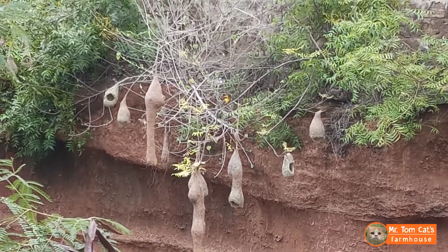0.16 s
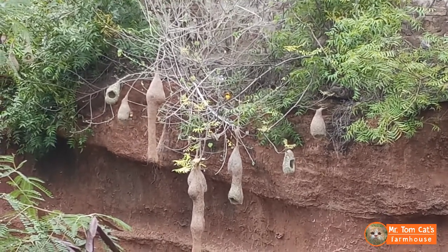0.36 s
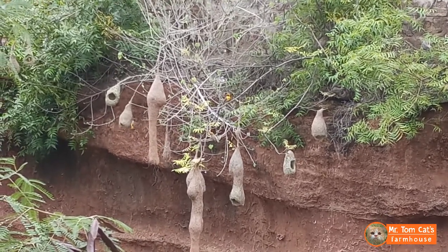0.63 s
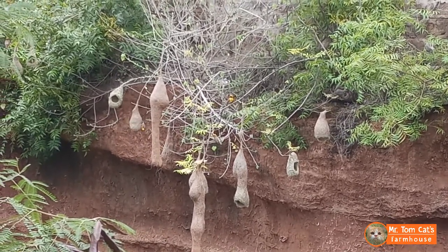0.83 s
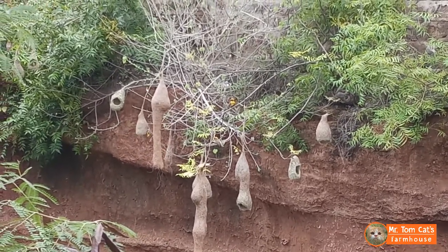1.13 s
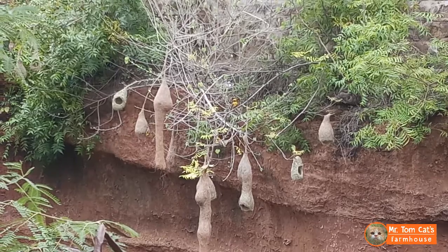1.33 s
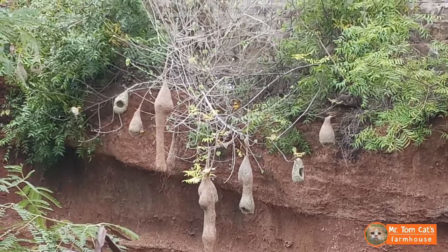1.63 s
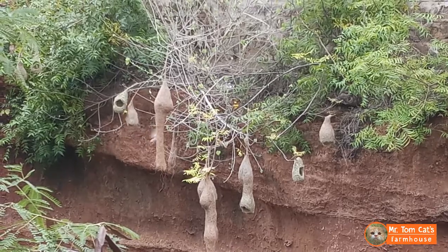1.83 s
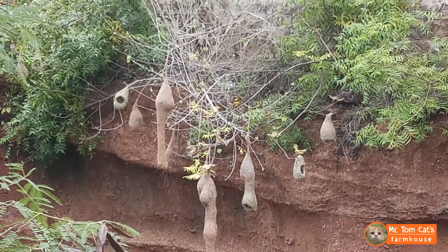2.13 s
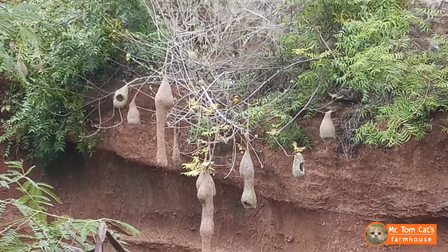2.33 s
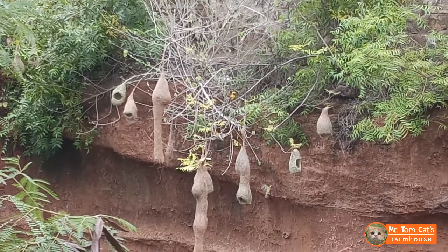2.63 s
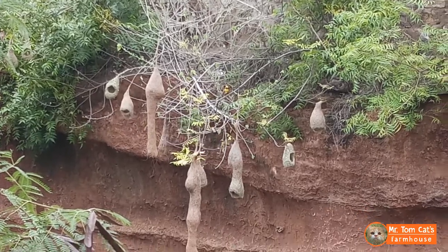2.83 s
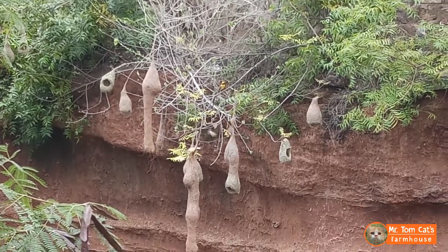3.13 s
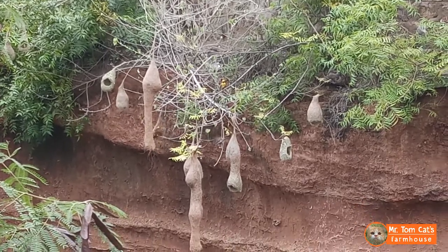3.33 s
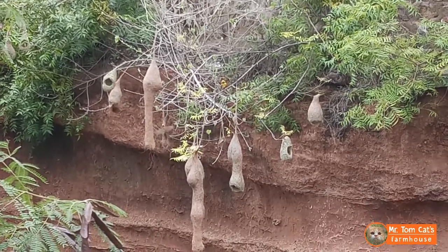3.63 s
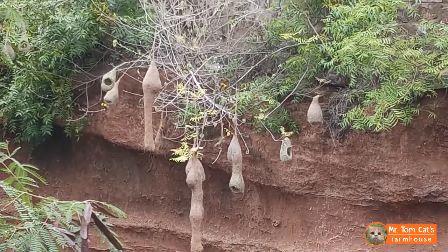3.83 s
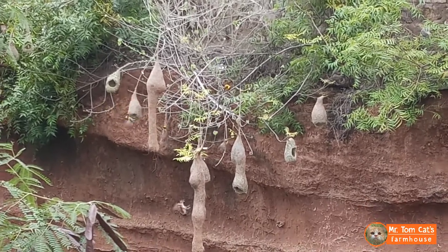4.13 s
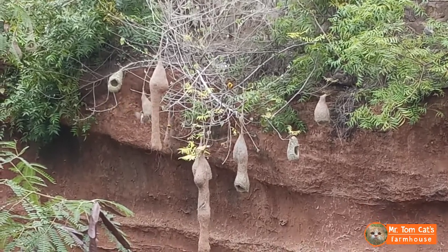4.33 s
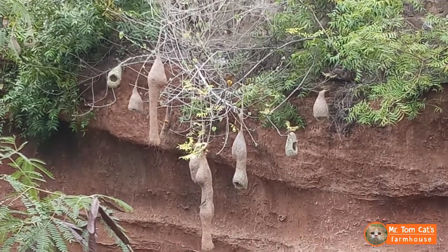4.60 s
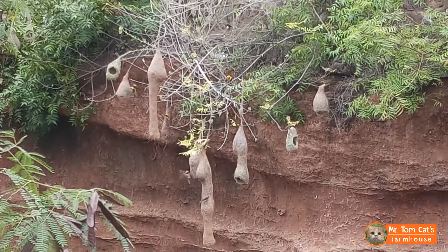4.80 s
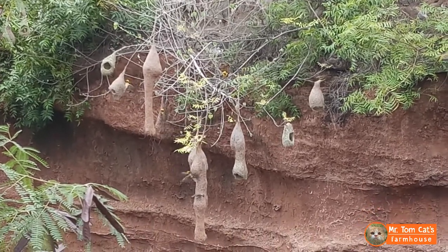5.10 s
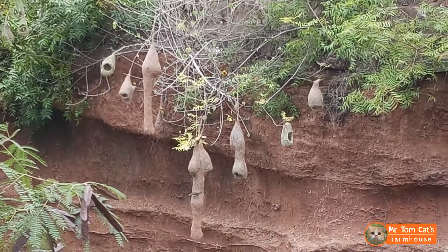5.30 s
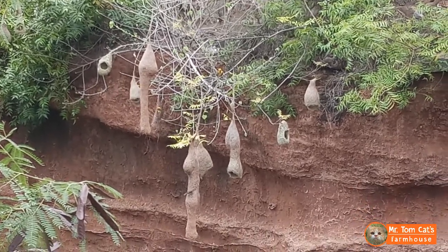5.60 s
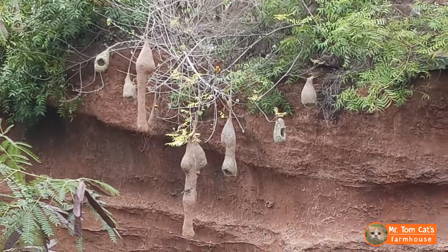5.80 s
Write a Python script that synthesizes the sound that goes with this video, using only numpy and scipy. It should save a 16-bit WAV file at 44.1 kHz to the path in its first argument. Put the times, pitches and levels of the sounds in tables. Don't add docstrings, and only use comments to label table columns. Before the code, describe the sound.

For the first 1.3 seconds it is quiet: a low, wavering far traffic drone, soft tyre roar swelling briefly through gaps, faint leaf hiss and barely audible distant bird slides, with thin down-sweeps near 1.2. From 1.35 to 1.7 a bird gives weak scratchy wheezes. At 1.73 a nearer weaver starts rapid harsh chatter, dry falling notes in pairs around thirteen to the second, strongest near 2.4, then easing; hoarser single notes run from 3.2 to 3.65. Blurred far chatter grows behind. From 3.7 to 4.45 airy, breathy wheezes take over, with a thin rising squeak at 4.17. From 4.5 the chorus thickens with loud nasal wheezes and bright sizzle, peaking near 5.1 and 5.5, joined by long falling whistles at 5.0 and 5.5 and a rise-and-fall at 5.8, where a tiny dry tick occurs. Short diffuse echoes surround the calls, which continue to the end at about six seconds.

```python
import sys
import numpy as np
from scipy import signal
from scipy.fft import rfft, irfft, next_fast_len
from scipy.io import wavfile
from scipy.ndimage import uniform_filter1d, map_coordinates

SR = 44100
rng = np.random.default_rng(int(sys.argv[2]) if len(sys.argv) > 2 else 0)


def log_audio(samples):
    frames = np.atleast_2d(samples).T
    limited = np.clip(frames, -1, 1)
    pcm = np.round(limited * 32767).astype(np.int16)
    wavfile.write(sys.argv[1], SR, pcm)


def magnitude_from_level(level_db):
    exponent = np.asarray(level_db, float) / 20
    return 10 ** exponent


N = 262395


def unit(x):
    return x / np.sqrt(np.mean(np.abs(x) ** 2) + 1e-20)


def along(points, hz):
    f, v = np.transpose(points)
    return np.interp(np.log(hz + 1), np.log(f + 1), v)


def curves(rows, t):
    s, *columns = np.transpose(rows)
    return [np.interp(t, s, column) for column in columns]


def wobble(rate, size=N):
    knots = rng.standard_normal(int(size * rate / SR) + 4)
    return map_coordinates(knots, [np.arange(size) * rate / SR])


def narrow(rate, size):
    return unit(wobble(rate, size=size) + 1j * wobble(rate, size=size))


def filtered(x, response):
    m = next_fast_len(len(x) + 8192)
    return irfft(rfft(x, m) * response(np.fft.rfftfreq(m, 1 / SR)), m)[:len(x)]


def rush(spectrum, patchy_db):
    z = signal.stft(rng.standard_normal(N + 512), nperseg=512)[2]
    field = uniform_filter1d(rng.standard_normal(z.shape), 6, 0)
    field = unit(uniform_filter1d(field, 14, 1))
    x = signal.istft(z * magnitude_from_level(patchy_db * field), nperseg=512)[1][:N]
    return unit(filtered(x, lambda hz: magnitude_from_level(along(spectrum, hz))))


def add(track, s, sound):
    part = track[round(s * SR):][:len(sound)]
    part += sound[:len(part)]


def note(third_hz, length, rasp):
    length = np.clip(length, .008, .15)
    t = np.arange(0, length + .16, 1 / SR)
    rasp_share = np.clip(rasp, 0, 1)
    breaking = 1 - np.exp(-(t / 0.0086) ** 3)
    step_down = .165 / (1 + (t / 0.019) ** 6)
    droop = .13 / (1 + (0.045 / (t + 1e-4)) ** 4)
    turns = np.cumsum(third_hz / 3 * (.85 + step_down - droop)) / SR
    voice = np.zeros(len(t))
    for k in range(4, 9):
        flecks = unit(narrow(400, size=len(t)) * magnitude_from_level(2.5 * wobble(140, size=len(t))))
        smear = np.sqrt(1 - breaking) + np.sqrt(breaking) * .7 * flecks
        size = magnitude_from_level((6 if k == 6 else -2) + 3 * rng.standard_normal())
        voice += size * (smear * np.exp(2j * np.pi * (k * turns + rng.random()))).real
    voice *= (1 - 0.27 * rasp_share * breaking) / np.std(voice)
    hook_db = -1 - 9 * (t / .042) ** 4 - 14 * rasp ** 2 - 5 * np.exp(-((t - .018) / .005) ** 2)
    hook = magnitude_from_level(hook_db) * np.sin(2 * np.pi * 3 * turns) * np.abs(1 + .7 * wobble(150, size=len(t)))
    hiss = rng.standard_normal(len(t)) * magnitude_from_level(1.9 * wobble(259, size=len(t)))
    breath = np.sqrt(rasp_share * (0.031 + 0.58 * breaking))
    release_db = -45 * np.maximum(t - length, 0) / 0.12
    soft_start_db = -4.4 * np.exp(-(t / 0.015) ** 2)
    shape = (1 - np.exp(-(t / 0.0046) ** 2)) * magnitude_from_level(release_db - 3 * t / length + soft_start_db)
    return shape * (np.array([hook, 0.63 * voice]) + magnitude_from_level([[-2], [1.5]]) * breath * hiss)


# f/Hz, level/dB
THROAT = [(590, -52), (1000, -71), (1970, -26.5), (2670, -15), (3720, -6.5), (4200, -4), (5330, -2.5),
          (6290, -4), (6830, -6.5), (8290, -9.5), (9000, -14), (11700, -65), (19800, -120)]
# f/Hz, width/Hz, level/dB
BEAK = [(4400, 500, 4), (5400, 450, 5), (6300, 400, 3)]


def throat(low, high):
    def lower(hz):
        return 1 / (1 + (hz / 3800) ** 12)

    def colour(hz):
        peaks_db = sum(db / (1 + (2 * (hz - c) / w) ** 2) for c, w, db in BEAK)
        return magnitude_from_level(along(THROAT, hz) + peaks_db)

    chest = filtered(low, lambda hz: colour(hz) * lower(hz))
    return chest + filtered(high, lambda hz: colour(hz) * (1 - lower(hz)))


# t/s, peak level/dB, third partial f/Hz, length/s, rasp (0-1)
PAIRED_NOTES = [(1.728, -8.5, 2860, 0.024, 0.4), (1.783, -7.5, 3267, 0.026, 0.33),
                (1.856, -10, 3037, 0.035, 0.4), (1.912, -9.5, 3206, 0.029, 0.55),
                (1.999, -11.5, 3085, 0.049, 0.08), (2.057, -14.5, 3090, 0.04, 0.6),
                (2.137, -12.5, 2997, 0.045, 0.26), (2.193, -9, 3050, 0.02, 0.47),
                (2.278, -6.5, 3025, 0.028, 0.77), (2.3302, -4.5, 3147, 0.022, 0.7),
                (2.4188, -3.5, 3015, 0.019, 0.63), (2.473, -7, 3035, 0.02, 0.6),
                (2.5688, -9.5, 3046, 0.026, 0.38), (2.624, -9, 3220, 0.027, 0.45),
                (2.7066, -9.5, 2970, 0.031, 0.5), (2.787, -10, 3020, 0.018, 0.6),
                (2.843, -19, 3085, 0.029, 0.9), (2.883, -15, 3130, 0.051, 0.36),
                (2.992, -14, 3170, 0.032, 0.4), (3.041, -13, 3180, 0.074, 0.6),
                (3.098, -14.5, 3225, 0.057, 0.75)]
# t/s, peak level/dB, length/s
HOARSE_NOTES = [
    (3.212, -15, 0.081),
    (3.27, -10.5, 0.037),
    (3.358, -13.5, 0.038),
    (3.463, -13.5, 0.053),
    (3.545, -13.5, 0.037),
    (3.62, -14, 0.068),
]
HOARSE_HZ, HOARSE_RASP = 3207, 0.68


def chatter():
    low, high = np.zeros((2, N))
    hoarse = [(s, db, HOARSE_HZ, length, HOARSE_RASP) for s, db, length in HOARSE_NOTES]
    for s, db, third_hz, length, rasp in PAIRED_NOTES + hoarse:
        chest, beak = magnitude_from_level(db - 6.0) * note(third_hz, length, rasp)
        chest_db = -0.5 + 4.5 * (s - PAIRED_NOTES[0][0])
        add(low, s, magnitude_from_level(chest_db) * chest)
        add(high, s, beak)
    return throat(low, high)


# t/s, peak level/dB, centre f/Hz, length/s, broad hiss level/dB
OPENING = [
    (1.353, -29.5, 3400, 0.05, 4),
    (1.396, -18.5, 3363, 0.06, -8),
    (1.42, -31, 4030, .08, -6),
    (1.449, -20, 3030, 0.059, -9),
    (1.575, -32, 3760, 0.065, 7),
    (1.648, -32.5, 4950, 0.042, 7),
]
# t/s, peak level/dB, centre f/Hz, length/s
HISSES = [
    (3.699, -25.5, 4410, 0.046),
    (3.732, -28, 5770, 0.081),
    (3.842, -25, 5140, 0.059),
    (3.925, -28, 4690, 0.077),
    (3.988, -27, 4700, 0.077),
    (4.067, -20.5, 5110, 0.057),
    (4.186, -23.5, 5980, 0.058),
    (4.237, -25, 4300, 0.065),
    (4.339, -24, 5830, 0.081),
    (4.422, -23, 5260, 0.11),
]
# t/s, peak level/dB, centre f/Hz, length/s, broad hiss level/dB
RISERS = [
    (4.165, -15.5, 7500, 0.055, -20),
    (5.073, -11.5, 7060, 0.04, -22),
]
# t/s, peak level/dB, centre f/Hz, length/s, broad hiss level/dB
CHORUS = [(4.492, -17.5, 5280, 0.075, 3), (4.582, -13.5, 5430, 0.094, 2), (4.697, -9, 5520, 0.08, -13),
          (4.769, -16, 4015, 0.071, -1.5), (4.863, -18.5, 4530, 0.091, 2.5), (4.928, -21.5, 4800, 0.055, 6),
          (5.091, -4.5, 4880, 0.072, -12), (5.002, -26, 5100, .08, 8), (5.156, -16, 4200, 0.039, -25),
          (5.367, -9, 4450, 0.077, -21), (5.392, -14, 5130, 0.1, -14), (5.48, -4, 5280, 0.065, -7.5),
          (5.541, -9, 4380, 0.11, -29), (5.622, -17, 4700, 0.089, -30), (5.778, -9, 4490, 0.051, -19),
          (5.865, -17, 6050, 0.081, -8)]
HISS_DB = 9
OPENING_SLIDE, SLIDE, RISE = -0.088, -0.204, 0.325


def wheezes():
    band, broad, t = np.zeros(N), np.zeros(N), np.arange(SR // 4) / SR
    calls = [(*row, OPENING_SLIDE) for row in OPENING]
    calls += [(*row, HISS_DB, SLIDE) for row in HISSES]
    calls += [(*row, RISE) for row in RISERS]
    calls += [(*row, SLIDE) for row in CHORUS]
    for s, db, hz, length, hiss_db, slide in calls:
        attack = 1 - np.exp(-(t / 0.0043) ** 2)
        shape = magnitude_from_level(db - 15.5) * attack * magnitude_from_level(-40 * np.maximum(t - length, 0) / 0.075)
        turns = np.cumsum(hz * 2 ** (slide * (np.minimum(t / length, 1.5) - .5))) / SR
        add(band, s, shape * (narrow(1117.0, size=len(t)) * np.exp(2j * np.pi * turns)).real)
        flutter = magnitude_from_level(hiss_db + 5.5 + 2.7 * wobble(194, size=len(t)))
        add(broad, s, shape * flutter * rng.standard_normal(len(t)))
    windpipe = lambda hz: 1 / (1 + (2600 / (hz + 1)) ** 14)
    return filtered(band, windpipe) + throat(magnitude_from_level(8.0) * broad, broad)


def whistles(calls, wheeze, rate=165.2):
    out = np.zeros(N)
    for rows in calls:
        t = np.arange(rows[0][0], rows[-1][0], 1 / SR)
        hz, db = curves(rows, t)
        skirt = .13 * narrow(1300, size=len(t))
        flutter = 1 + wheeze * narrow(rate, size=len(t)) + skirt
        swing = np.exp(2j * np.pi * np.cumsum(uniform_filter1d(hz, 400)) / SR)
        edges = np.clip(np.minimum(t - t[0], t[-1] - t) / .008, 0, 1)
        add(out, t[0], magnitude_from_level(db + 13.0) * edges * (unit(flutter) * swing).real)
    return out


def glide(calls):
    paths = []
    for s, length, hz, to_hz, db in calls:
        start = (s, hz, db - 2)
        peak = (s + .45 * length, hz + 0.54 * (to_hz - hz), db)
        paths.append([start, peak, (s + length, to_hz, db - 3)])
    return paths


# t/s, f/Hz, level/dB
SONG = [
    [(5.01, 7150, -38), (5.032, 6950, -35), (5.07, 5900, -33), (5.095, 5050, -31), (5.12, 4620, -28),
     (5.158, 4300, -23), (5.215, 3750, -25), (5.24, 3450, -31), (5.26, 3380, -35)],
    [(5.493, 6870, -38), (5.531, 6220, -29), (5.581, 4830, -26), (5.61, 4480, -22), (5.67, 3930, -24),
     (5.715, 3550, -27), (5.732, 3440, -35)],
    [(5.82, 5750, -38), (5.842, 6020, -32), (5.87, 6420, -30), (5.9, 5950, -30), (5.95, 5250, -29)],
]
# t/s, length/s, from f/Hz, to f/Hz, peak level/dB
ANSWERS = [(.19, .068, 1750, 1690, -77), (.25, .35, 878, 860, -90), (4.22, .065, 5100, 4950, -41),
           (4.2, .09, 4300, 4600, -40), (4.493, .065, 5600, 5250, -38), (4.593, .03, 5600, 5500, -35),
           (4.885, .105, 4750, 3300, -37), (5.25, .026, 6400, 6650, -42), (2.715, .035, 2200, 2130, -62),
           (5.865, .085, 4480, 4200, -36), (5.39, .078, 4600, 4170, -35), (5.86, .09, 4600, 3500, -40)]
# t/s, length/s, from f/Hz, to f/Hz, peak level/dB
FAINT_SLIDES = [
    (.17, .17, 3530, 3430, -75),
    (.995, .05, 4800, 4300, -66),
    (1.05, .07, 3800, 3450, -69),
    (1.05, .11, 4600, 4200, -71),
    (.93, .12, 6200, 6300, -73),
    (.97, .09, 2400, 2100, -78),
    (.56, .35, 6280, 6300, -77),
]
# t/s, length/s, from f/Hz, to f/Hz, peak level/dB
WHEEZY_SLIDES = [(4.51, .07, 4700, 3800, -43), (5.35, .05, 4900, 4500, -43), (4.342, .04, 6400, 4900, -43),
                 (4.172, .045, 6400, 8000, -41), (4.175, .05, 7200, 8650, -44), (4.23, .06, 900, 975, -80),
                 (4.342, .065, 6550, 6450, -45), (4.19, .045, 6000, 6500, -44),
                 (4.765, .08, 4600, 3350, -36), (4.882, .06, 6350, 4750, -35),
                 (4.935, .06, 4750, 4550, -36), (1.58, .02, 5200, 2900, -56), (5.355, .09, 6200, 4800, -37),
                 (4.7, .065, 5550, 5150, -33), (4.625, .03, 5700, 5250, -33), (4.66, .03, 5550, 5300, -36),
                 (4.6, .06, 4700, 4200, -39), (4.55, .045, 4100, 3750, -42), (1.362, .025, 3100, 5000, -58),
                 (4.718, .06, 4500, 4300, -37), (4.74, .045, 4950, 4350, -35)]
# t/s, f/Hz, level/dB
SWEEPS = [
    [(1.14, 6850, -66), (1.175, 4900, -66), (1.21, 3900, -71)],
    [(1.27, 6650, -61), (1.3, 5000, -61), (1.333, 3250, -61), (1.357, 2750, -65)],
]
# t/s, length/s, from f/Hz, to f/Hz, peak level/dB
STRANDS = [(5.155, .035, 4950, 5200, -32), (5.575, .1, 5600, 5200, -34), (5.86, .04, 6650, 6550, -38),
           (5.89, .06, 6100, 5350, -32), (5.475, .06, 5900, 4600, -36), (4.71, .085, 11700, 11300, -59),
           (5.49, .06, 10500, 11500, -57), (4.19, .06, 11500, 14000, -62), (5.385, .03, 8100, 7900, -47),
           (5.505, .055, 7900, 7700, -46), (5.627, .03, 7700, 7800, -46), (5.63, .045, 8400, 8400, -52),
           (5.19, .035, 8350, 8250, -50), (5.03, .06, 8300, 7900, -53), (5.775, .05, 4400, 5250, -40),
           (5.795, .07, 4200, 4550, -40), (5.03, .05, 12400, 12450, -63), (5.095, .05, 11500, 11650, -57),
           (5.62, .05, 11600, 12200, -55), (5.82, .06, 10100, 10900, -59), (5.85, .07, 13000, 12000, -59),
           (1.37, .15, 5450, 5350, -59), (1.65, .06, 5350, 5400, -55), (1.66, .05, 4350, 4250, -57),
           (4.075, .045, 7000, 7300, -49), (4.42, .07, 5900, 6100, -46)]


def whistled_calls():
    clear = magnitude_from_level(-2.5) * whistles(SONG, wheeze=0.45) + whistles(glide(ANSWERS), wheeze=0.32)
    clear = clear + whistles(glide(FAINT_SLIDES + WHEEZY_SLIDES), wheeze=1.2, rate=270)
    clear = clear + whistles(SWEEPS, wheeze=.2)
    return clear + whistles(glide(STRANDS), wheeze=3, rate=450)


# f/Hz, level/dB
OVERTONES = [(8000, -55), (9200, -23), (11500, -20.5), (13300, -23), (15800, -32)]


def overtones(x):
    z = signal.hilbert(x, next_fast_len(N))[:N]
    size, swing = np.abs(z) / 0.049, z / (np.abs(z) + 1e-9)
    made = size ** 0.81 * swing ** 2 + magnitude_from_level(-10.5) * size ** 1.44 * swing ** 3
    return filtered(0.054 * made.real, lambda hz: magnitude_from_level(along(OVERTONES, hz)))


# t/s, length/s, level/dB, share above 13.5 kHz level/dB
SIZZLE = [(1.378, .14, -71, -30), (1.587, 0.088, -83, -30), (4.074, 0.042, -54, -3), (4.185, .1, -56, -3),
          (4.34, .04, -58, -3), (4.497, .06, -48, -7), (4.605, .07, -46.5, -6), (4.707, 0.073, -47, -6),
          (4.88, .025, -48.5, -5), (4.927, .03, -52, -5), (5.09, .04, -55, 2), (5.154, 0.033, -58, 8),
          (5.271, 0.042, -57, -3), (5.375, 0.063, -50, -2), (5.476, 0.072, -46.5, -4),
          (5.578, .1, -48.5, -4), (5.792, 0.12, -48.5, -4)]
# f/Hz, level/dB
EDGE = [(9000, -30.5), (10200, 3), (11500, 4), (13000, -5.5), (13600, -37)]
# f/Hz, level/dB
TOP = [(12800, -27), (13600, -5), (15000, -1), (15800, 0)]


def sizzle():
    edge, top, t = np.zeros(N), np.zeros(N), np.arange(SR // 4) / SR
    for s, length, db, top_db in SIZZLE:
        attack = 1 - np.exp(-(t / 0.0049) ** 2)
        shape = magnitude_from_level(db + 3) * attack * magnitude_from_level(-40 * np.maximum(t - length, 0) / .06)
        add(edge, s, shape)
        add(top, s, shape * magnitude_from_level(top_db))
    bands = edge * rush(EDGE, patchy_db=5.5) + top * rush(TOP, patchy_db=7.5)
    return magnitude_from_level(1.3 * wobble(150)) * bands


# f/Hz, T60/s
BANK = [(1000, 0.55), (2500, 0.24), (4000, 0.25), (12000, 0.16)]


def echoes(x):
    step, out = SR // 5, np.zeros(N)
    window = signal.get_window("hann", 2 * step)
    for i in range(0, N, step):
        hz, t, z = signal.stft(rng.standard_normal(SR // 3), SR, nperseg=128)
        decay = magnitude_from_level(-60 * t / along(BANK, hz)[:, None])
        tail = signal.istft(z * decay, SR, nperseg=128)[1]
        piece = x[i:i + 2 * step]
        echo = signal.fftconvolve(piece * window[:len(piece)], tail / np.linalg.norm(tail))
        add(out, i / SR + .003, echo)
    return out


# t/s, level/dB
CROWD = [(1.2, -85), (1.35, -72), (1.45, -59), (1.7, -49), (1.91, -33.5), (2.5, -27), (3.1, -34),
         (3.6, -26), (4.15, -31.5), (4.25, -26), (4.33, -32), (4.71, -21.5), (4.86, -29.5), (5.02, -27.5),
         (5.15, -37.5), (5.27, -22.5), (5.34, -24), (5.45, -23.5), (5.56, -30.5), (5.77, -21), (5.95, -26)]
# f/Hz, level/dB
DISTANCE = [(1500, -3), (3000, 8.5), (8000, 2.5), (15000, 17)]


def crowd(count=500):
    far = np.zeros(N)
    voices = [note(hz, 0.04, 0.8).sum(axis=0) for hz in rng.uniform(2500, 3700, 20)]
    for i, (late, who, size) in enumerate(rng.random((count, 3))):
        add(far, (i + late) * N / SR / count, magnitude_from_level(11 * size) * voices[int(who * len(voices))])
    far = filtered(throat(far, far), lambda hz: magnitude_from_level(along(DISTANCE, hz)))
    return magnitude_from_level(curves(CROWD, np.arange(N) / SR)[0]) * magnitude_from_level(-1) * unit(far)


def in_step(near):
    strength, deepest_db, free_s = .4, -9, 4.95
    power = near ** 2 + magnitude_from_level(-110)
    follow = strength * np.clip(free_s + .5 - np.arange(N) / SR, .25, .5) * 2
    ratio = uniform_filter1d(power, SR // 30) / uniform_filter1d(power, SR // 4)
    return np.maximum(ratio, magnitude_from_level(deepest_db / strength)) ** follow


# t/s, level/dB
MURMUR = [(0, -76), (.83, -66), (1.37, -66), (1.52, -57), (2.4, -57.5), (3.4, -51), (3.84, -49.5),
          (4.31, -50.5), (5.1, -57.5), (5.95, -54)]
# f/Hz, level/dB
FAR_BAND = [(900, -25.5), (1400, -13), (1900, -2), (2400, 2), (3200, -20.5)]


def murmur():
    return magnitude_from_level(curves(MURMUR, np.arange(N) / SR)[0] + 0.5) * rush(FAR_BAND, patchy_db=2.2)


# t/s, level/dB
TWIG = (5.779, -34)


def twig():
    out, t = np.zeros(N), np.arange(400) / SR
    crack = 1.6 * np.exp(-t / .00025) * np.sin(2 * np.pi * 13200 * t)
    add(out, TWIG[0], magnitude_from_level(TWIG[1]) * (np.exp(-t / .0004) + crack))
    return out


# f/Hz, level/dB
LEAVES = [(240, 7), (400, -8), (727, -14.5), (860, -14.5), (987, -15), (1030, -16.5), (1740, -9.5),
          (2670, -14), (3410, -8.5), (3980, -6.5), (7930, -5), (9530, -28.5), (15600, -61)]
# t/s, level/dB
BREEZE = [(0, -66.5), (1.6, -66), (1.9, -62), (3, -70), (4.5, -72), (5.95, -74)]
# t/s, level/dB, width/s, centre f/Hz, width/Hz
LULL = (-1.5, -7.5, 0.6, 3102, 1800)


def leaves():
    t = np.arange(N) / SR
    s, db, width, hz, wide_hz = LULL
    hiss = rush(LEAVES, patchy_db=2.5)
    lower = filtered(hiss, lambda f: np.exp(-((f - hz) / wide_hz) ** 4))
    rest = magnitude_from_level(db * np.exp(-((t - s) / width) ** 2)) - 1
    return magnitude_from_level(curves(BREEZE, t)[0] + 17.0) * (hiss + rest * lower)


# t/s, rise level/dB, width/s
TYRES = [
    (.28, 7, 0.075),
    (.51, 6, 0.033),
    (.76, 9.5, 0.12),
    (1.0, 7, 0.047),
    (1.12, 13.5, 0.1),
    (2.1, 5.5, 0.66),
    (2.78, 9.5, 0.14),
    (4.2, 10, 0.19),
    (5.79, 19, 0.023),
]
# f/Hz, level/dB
ROAD = [(150, -57), (240, 3), (320, 0), (450, -10), (700, -28.5), (1200, -47)]


def tyres():
    t = np.arange(N) / SR
    swells_db = sum(db * np.exp(-((t - s) / width) ** 2) for s, db, width in TYRES)
    receding_db = -63 - 0.78 * t
    return magnitude_from_level(receding_db + swells_db - 1.5 * wobble(4.37)) * rush(ROAD, patchy_db=3.5)


# f/Hz, level/dB
TRAFFIC = [(12, -46), (20, -8), (75, 1), (124, -0.5), (184, -6.5), (231, -27), (260, -16), (340, -43),
           (570, -120)]
# f/Hz, width/Hz, level/dB
ENGINES = [(105.4, 14, -52), (130.3, 10, -48.5), (156.9, 25, -53), (191.4, 10, -59), (261.5, 8, -65)]
# t/s, level/dB
DRONE = [(0, -41), (.6, -44), (.75, -40), (.9, -43.5), (1.26, -49), (1.64, -42), (2.12, -48), (2.5, -48.5),
         (2.75, -44), (3.1, -47.5), (3.8, -52), (3.92, -45.5), (4.37, -43.5), (4.6, -49), (5.0, -52),
         (5.15, -43.5), (5.62, -44.5), (5.95, -43)]


def traffic():
    roar = magnitude_from_level(-5.0) * rush(TRAFFIC, patchy_db=1.5) * magnitude_from_level(1.0 * wobble(5.8))
    for hz, width, db in ENGINES:
        hum = filtered(rng.standard_normal(N), lambda f: 1 / (1 + (2 * (f - hz) / width) ** 2))
        roar += magnitude_from_level(db + 44.5 + 1.3 * wobble(3.2)) * unit(hum)
    return magnitude_from_level(curves(DRONE, np.arange(N) / SR)[0] + 1.0) * unit(roar)


def scene():
    near, wheezy, clear = chatter(), wheezes(), whistled_calls()
    harsh = near + wheezy
    far = crowd() * in_step(harsh + clear)
    distorting = near + 0.74 * wheezy + 0.38 * clear + .5 * far
    birds = harsh + clear + overtones(distorting) + sizzle()
    scattered = echoes(birds - .35 * clear)
    background = murmur() + twig() + leaves() + tyres() + traffic()
    return (magnitude_from_level(0.5) * birds + magnitude_from_level(1.0) * scattered + far + background)[None]


# f/Hz, level/dB
PORT = [(20, -2.5), (8700, -4), (9200, -10.5), (9900, -8.5), (10400, -6.5), (15800, 0)]


def microphone(dry):
    port = lambda hz: magnitude_from_level(along(PORT, hz)) * hz ** 2 / (hz ** 2 + 30 ** 2)
    return (filtered(dry[0], port) + magnitude_from_level(-79.5) * rng.standard_normal(N))[None]


def roll_off(x):
    return signal.sosfilt(signal.butter(12, 15830, fs=SR, output="sos"), x)


def record(dry):
    mix = microphone(dry)
    return roll_off(mix)


dry = scene()
out = record(dry)
log_audio(out)
```